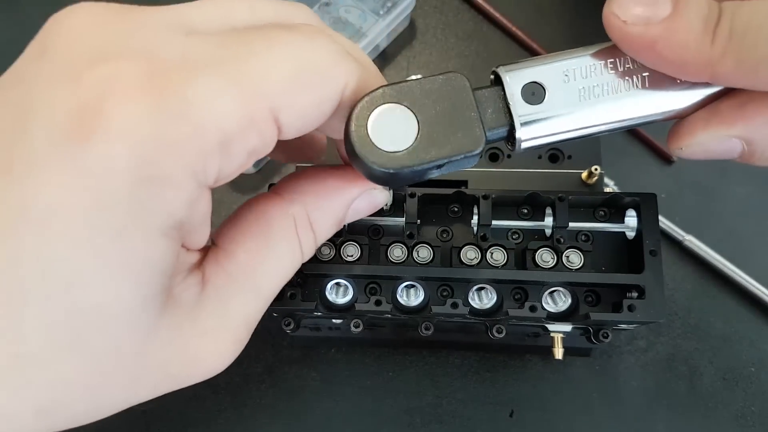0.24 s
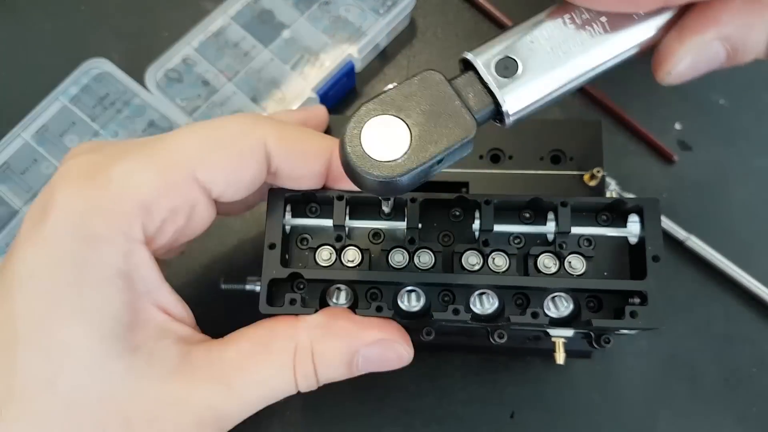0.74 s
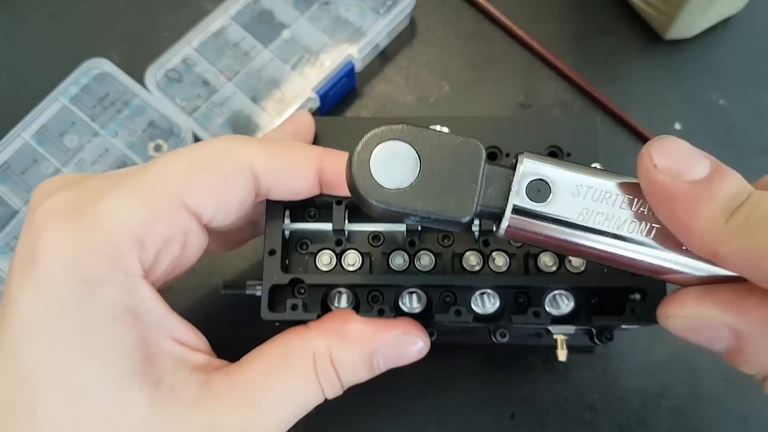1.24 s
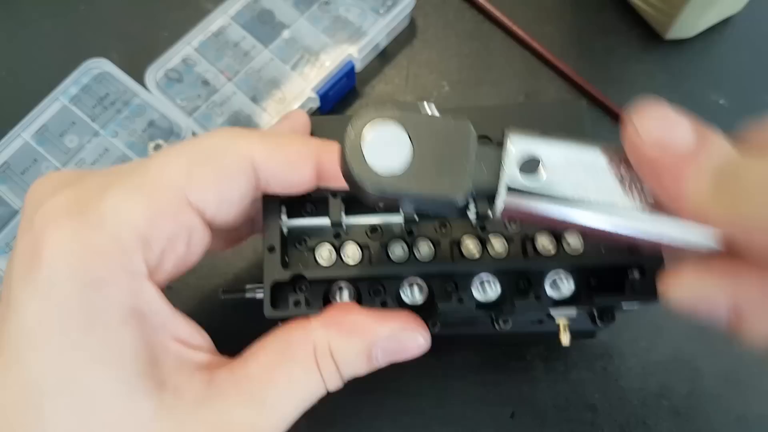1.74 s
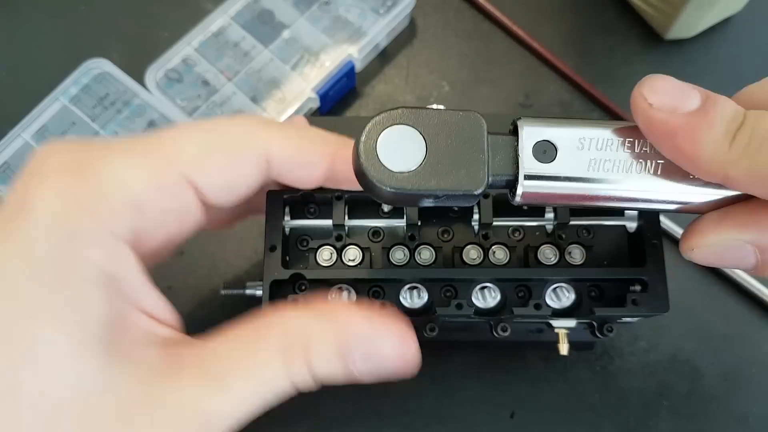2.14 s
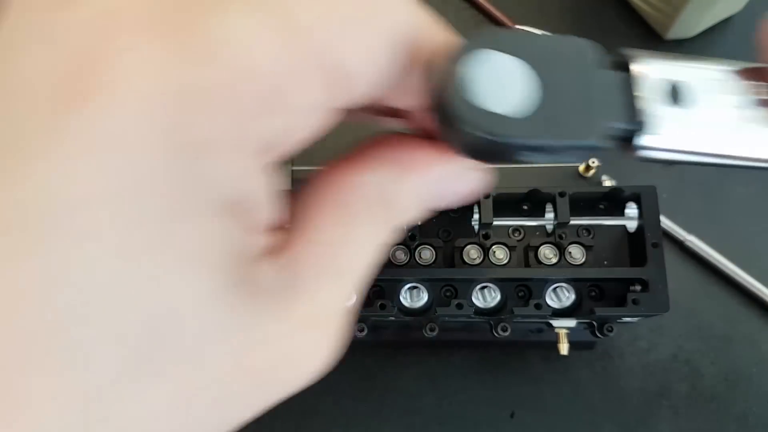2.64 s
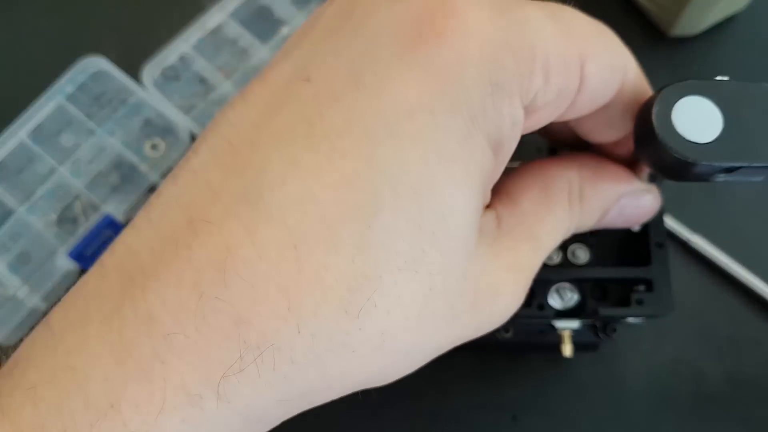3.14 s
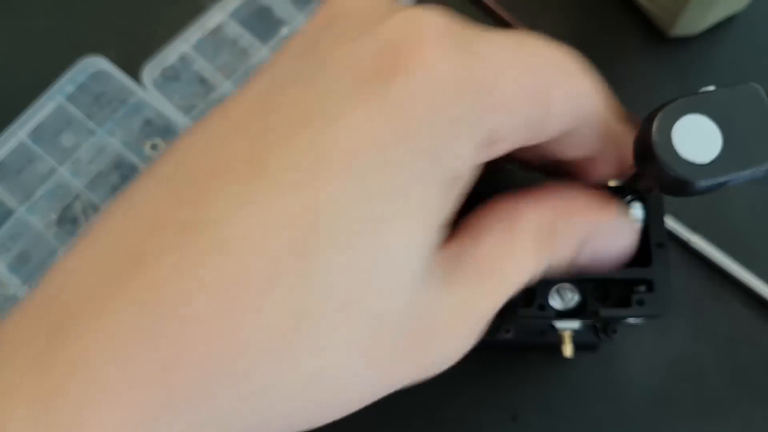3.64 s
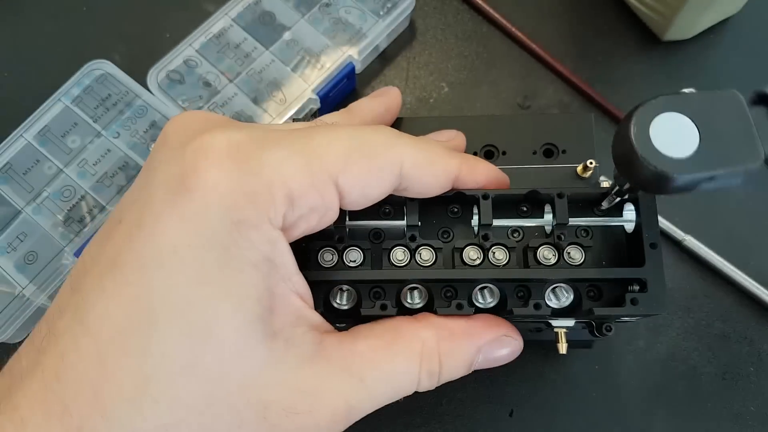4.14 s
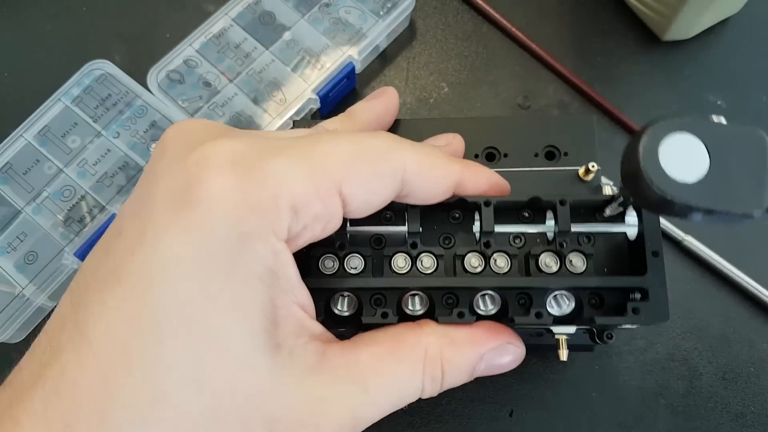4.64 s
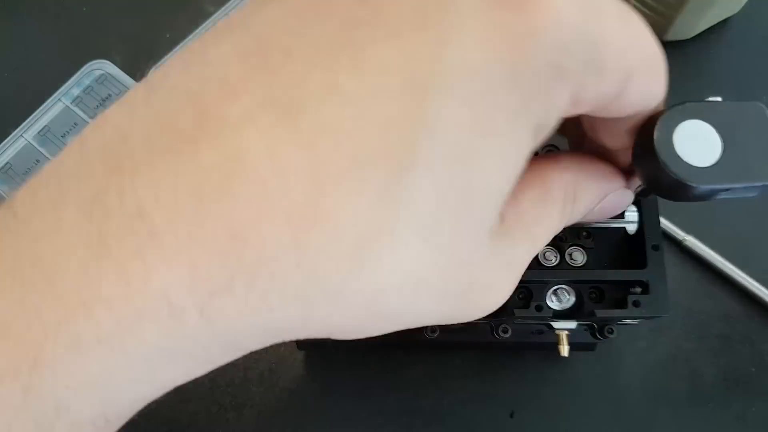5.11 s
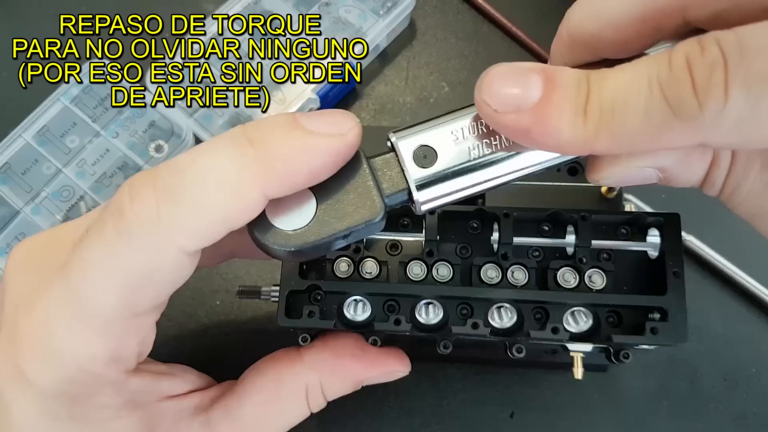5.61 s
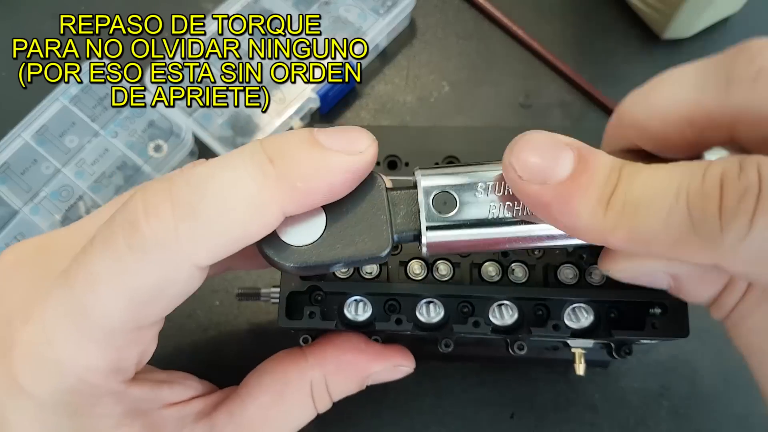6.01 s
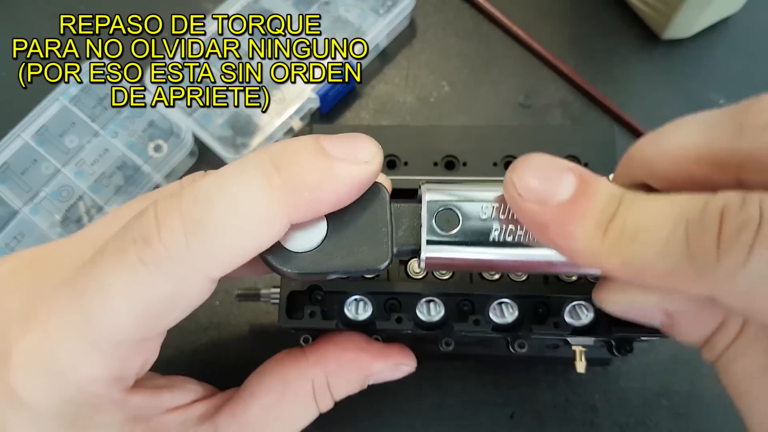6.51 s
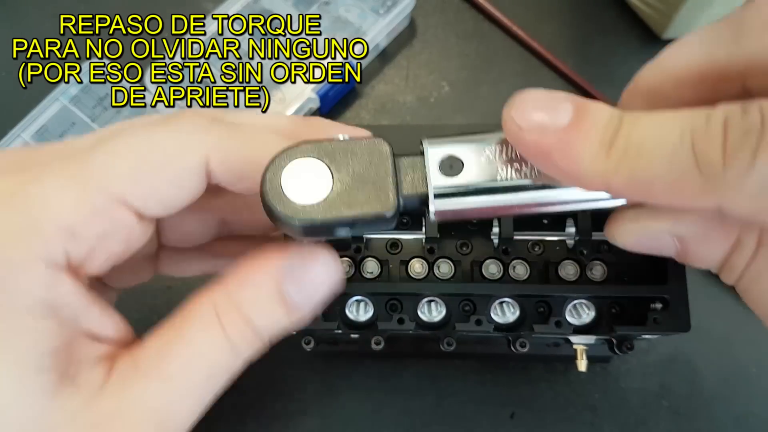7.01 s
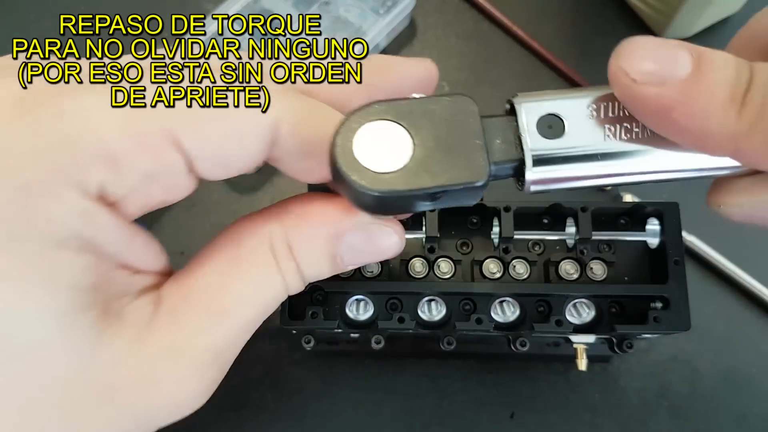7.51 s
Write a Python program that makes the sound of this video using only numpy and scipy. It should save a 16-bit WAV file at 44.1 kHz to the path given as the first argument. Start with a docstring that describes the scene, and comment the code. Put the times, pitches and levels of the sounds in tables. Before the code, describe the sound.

Stereo phone microphone very near small steel parts. Dry metallic clicks with short bright room tails arrive in three clusters of four, four and six, the later ones stronger. Between them the bit ticks, scrapes and pings lightly on bolts, and hands nudge the desk with soft low thumps. A rumbling fan fills the first two thirds, then cuts suddenly to much quieter hissy air.

```python
"""Torque wrench on a model engine

A small click-type torque wrench works on a model engine on a desk, close to a phone with two ports.
Snaps of its pawl and taps of its bit are short rattles filtered by steel modes, a wall and a small room.
The bit pings as decaying sines; scrapes and other short noises are grainy; the desk thuds as low sines.
A fan roars as shaped noise; after a cut to a later moment the low roar is far weaker and a mid hiss
stands out. A faint airy band swells and sinks throughout."""
import sys
import numpy as np
from scipy import signal
from scipy.fft import rfft, irfft, next_fast_len
from scipy.io import wavfile
from scipy.ndimage import uniform_filter1d

SR = 44100
rng = np.random.default_rng(int(sys.argv[2]) if len(sys.argv) > 2 else 0)


def int16_out(signal):
    """Quantize to a 16-bit WAV file."""
    q = np.round(np.clip(np.atleast_2d(signal).T, -1, 1) * 32767)
    wavfile.write(sys.argv[1], SR, q.astype(np.int16))


N = 342216
T = np.arange(N) / SR
SIDES = np.array([[.5], [-.5]])  # splits a left-right difference between the two ports
CUT_S = 5.543
FLOOR_TOP_HZ = 15900  # upper limit of background, grainy noise and room tail

# stereo likeness of the roar and the airy band: f/Hz, left-right correlation
ROAR_ALIKE = [(60, 0.89), (120, 1), (240, 0.9252), (480, 0.59), (950, 0.31), (1890, 0.22), (3770, 0.066),
              (7520, 0.098), (15000, -0.25)]
# stereo lean of the roar and the airy band: f/Hz, left-right level/dB
ROAR_LEAN = [(60, 1.5), (240, 1.5), (950, 1.5), (3770, -0.5), (15000, 0.5)]


def amp(db):
    """Gain of a level in dB."""
    return 10 ** (np.asarray(db) / 20)


def unit(x):
    """x at rms 1."""
    return x / np.sqrt(np.mean(x ** 2) + 1e-20)


def along(points, hz):
    """Interpolate (Hz, value) points on a log frequency axis."""
    f, v = np.transpose(points)
    return np.interp(np.log(hz + 1), np.log(f + 1), v)


def filtered(x, response):
    """Shape x by a complex response of frequency."""
    n = x.shape[-1]
    m = next_fast_len(2 * n if n < SR else n + 8192)
    return irfft(rfft(x, m) * response(np.fft.rfftfreq(m, 1 / SR)), m)[..., :n]


def add(track, s, sound):
    """Lay a stereo sound on the track at a time in seconds."""
    part = track[:, round(s * SR):][:, :sound.shape[1]]
    part += sound[:, :part.shape[1]]


def humps(peaks, hz):
    """Gain in dB of gentle resonances."""
    return sum(db / (1 + (2 * (hz - c) / w) ** 2) for c, w, db in peaks)


def air(colour_db, alike, lean, patchy_db):
    """Stereo noise of rms 1 with soft time-frequency patches of random gain."""
    z = signal.stft(rng.standard_normal((2, N)), nperseg=512)[2]
    field = uniform_filter1d(rng.standard_normal(z.shape[1:]), 6, 0)
    field = uniform_filter1d(field, 14, 1)
    pair = signal.istft(z * amp(patchy_db * unit(field)), nperseg=512)[1][:, :N]

    # the mix of mid and side sets how alike the ports are
    def turn(hz):
        return np.arccos(np.clip(along(alike, hz), -1, 1)) / 2

    def gain(hz):
        return amp(colour_db(hz) + SIDES * along(lean, hz)) * (hz < FLOOR_TOP_HZ)

    mid, side = filtered(pair, lambda hz: [np.cos(turn(hz)), np.sin(turn(hz))])
    return unit(filtered(np.array([mid + side, mid - side]), gain))


def fan():
    """Fan noise in the room's low resonances, and the thinner background after the cut."""
    # broad colour of the roar: f/Hz, relative level/dB
    roar_colour = [(12, -54), (20, -12), (60, -18), (135, -2), (237, -8.5), (372, -7.5), (465, -12),
                   (816, -13), (966, -15), (1650, -20.5), (3140, -31.5), (4530, -38.5), (8650, -51),
                   (15200, -47.5), (16500, -78)]
    # resonances in the roar: f/Hz, width/Hz, boost/dB
    roar_peaks = [(130, 38.5, 5.5), (205.6, 8.6, 8), (374.3, 43, 4.5), (807, 100, 6), (550, 62, 3.5),
                  (1624, 13, 5.5), (2820, 150, 4)]
    # broad colour of the hiss: f/Hz, relative level/dB
    hiss_colour = [(12, -41), (20, 3), (48, -12), (65, -14), (131, -0.5), (237, -6), (361, -7.5), (452, -9),
                   (839, -10.5), (994, -16), (1430, -17.5), (2660, -2.5), (8650, -24.5), (15200, -23),
                   (16500, -22)]
    # resonances in the hiss: f/Hz, width/Hz, boost/dB
    hiss_peaks = [(132, 28.63, 5), (199.5, 16, 6), (371, 42, 8), (820, 150, 3.5), (1849.8, 190, 6),
                  (2440, 290, 1.5), (3320, 354, -2), (4593, 456, -2.5)]
    # stereo likeness of the hiss: f/Hz, left-right correlation
    hiss_alike = [(60, 0.9496), (180, 0.9968), (550, 0.6), (1650, 0.14), (4970, 0.072), (15000, 0.0)]
    # stereo lean of the hiss: f/Hz, left-right level/dB
    hiss_lean = [(60, 1), (240, 2.5), (950, 1), (3770, -0.5), (15000, 0.5)]
    roar_db, hiss_db = -33.5, -46
    roar = air(lambda hz: along(roar_colour, hz) + humps(roar_peaks, hz),
               ROAR_ALIKE, ROAR_LEAN, patchy_db=0.37)
    hiss = air(lambda hz: along(hiss_colour, hz) + humps(hiss_peaks, hz),
               hiss_alike, hiss_lean, patchy_db=1.421)
    return np.where(T < CUT_S, amp(roar_db) * roar, amp(hiss_db) * hiss)


def airy_band():
    """A faint band of air noise around 4550 Hz swells and sinks."""
    # swells of the band: t/s, level/dB
    swells = [(0, -74), (.45, -65), (.9, -56.5), (.97, -68), (1.35, -75), (1.43, -58), (1.75, -64),
              (2.1, -63), (2.4, -70), (4.0, -69), (4.8, -60), (4.9, -53), (5.05, -68), (5.5, -74),
              (5.56, -52), (5.75, -62), (7.0, -62), (7.76, -58)]
    band = air(lambda hz: -20 * np.log10(1 + ((hz - 4550) / 480) ** 2),
               ROAR_ALIKE, ROAR_LEAN, patchy_db=1.5)
    return amp(np.interp(T, *np.transpose(swells))) * band


def rattle(ms, shared_hz):
    """A few ms of contacts with an even spectrum; the ports hear them alike only in the bass."""
    first_db = 5  # the first contact stands out
    t = np.arange(1024) / SR
    fade = np.exp(-(t / (abs(ms) / 1000)) ** 2)
    z = rfft(rng.standard_normal((3, len(t))) * fade * amp(first_db * np.exp(-t / 0.00034)))
    share = 1 / (1 + (np.fft.rfftfreq(len(t), 1 / SR) / shared_hz) ** 6)
    z = np.sqrt(share) * z[0] + np.sqrt(1 - share) * z[1:]
    even = irfft(z / np.sqrt(uniform_filter1d(abs(z) ** 2, size=10)))
    return even * (t < .01)


def steel(hz, spread_db):
    """The modes of wrench and engine block, each struck at a new strength."""
    # resonant modes: f/Hz, width/Hz, level/dB
    modes = [(1210, 230, -7), (1580, 250, 0), (2100, 350, 0.5), (2473, 320, 1), (3310, 385, 3),
             (4100, 380, 3), (4750, 520, 4), (5730, 870, 3), (6970, 540, 5), (7960, 580, 0),
             (10430, 2200, -2), (11270, 1740, -1), (12900, 640, -2), (14100, 698.8, -2), (15100, 580, 5.5)]
    draw = rng.normal(0, spread_db, len(modes))
    return sum((-1) ** k * amp(db + draw[k]) * 1j * hz * w / (c * c - hz * hz + 1j * hz * w)
               for k, (c, w, db) in enumerate(modes))


def room(spectrum):
    """A fresh diffuse tail of the given colour; each frequency dies at its own speed."""
    # decay of the room: f/Hz, t60/s
    decay = [(1000, 0.3), (3000, 0.6), (7000, 0.62), (15000, 0.27)]
    # colour of the room: f/Hz, level/dB
    colour = [(1500, -1), (2600, 0.5), (4500, -1.5), (7000, -2.5), (9500, -3), (13000, 0), (15500, -7)]
    hz, t, z = signal.stft(rng.standard_normal((2, SR // 2)), SR, nperseg=256)
    fade_db = along(colour, hz) + along(spectrum, hz) - 60 * t[:, None] / along(decay, hz)
    return signal.istft(z * amp(fade_db.T) * (hz < FLOOR_TOP_HZ)[:, None], SR, nperseg=256)[1]


def clicks(rows, colours):
    """Each click is a short rattle that rings the steel, then a wall and the room; colours take turns."""
    # bands knock, tock, tick, body, clack, ring, fizz, sparkle: middle f/Hz, width/Hz
    bands = [(1500, 600), (2100, 1050), (2600, 1050), (3300, 950), (4900, 2400), (7200, 2100),
             (10400, 4700), (14700, 3500)]
    # share of a click's weight in each band [ratio]
    weight_reach = [1.38, 1.2, 1.07, 1.26, 0.06, 0.36, 0.57, 0.084]
    # share of a click's brightness in each band [ratio]
    bright_reach = [0.43, 0.18, 0, 0.037, 0, 0.54, 0.72, 1]
    # colour change of every click after the cut: f/Hz, level/dB
    after_cut = [(1500, -23.5), (2100, -12), (2600, 8), (3300, 2.5), (4900, 0), (7200, 1.5), (15000, -3.5)]
    # port balance for near sounds: f/Hz, left-right level/dB
    ports = [(1500, -1), (2000, 2.5), (2600, -9), (3300, 2), (5500, -1), (6800, -5), (9000, 5.5),
             (15000, 1.5)]
    # phase between the ports: f/Hz, left lead/rad
    port_lead = [(1400, 0), (2000, -2.1), (2600, -3.5)]
    direct_db, answer_db = 68, 24.5  # gain of the rattle, of the room's answer
    edge_db, deep_db = -9.5, -30  # fall beyond the outer bands, in the deep bass
    wall_s, wall_db = .0105, -17.5  # a near wall returns each click once, as a fresh rattle
    lead = 64  # samples of silence ahead of a rattle, room for the phase shift
    out, (hz_mid, width) = np.zeros((2, N)), np.transpose(bands)
    for k, (s, db, weight_db, bright_db, pan_db, ms, *more) in enumerate(rows):
        tint_db = weight_db * np.array(weight_reach) + bright_db * np.array(bright_reach)
        tint_db = tint_db + (s > CUT_S) * along(after_cut, hz_mid)
        tint_db[[0, 3]] += more[:2] or 0  # extra knock and body, where given
        level_db = db + tint_db + colours[k % len(colours)] - 10 * np.log10(width)
        spectrum = [(450, level_db[0] + deep_db), (900, level_db[0] + edge_db),
                    *zip(hz_mid, level_db), (17000, level_db[-1] + edge_db)]

        def gain(hz):
            balance_db = SIDES * (pan_db + along(ports, hz))
            level = amp(along(spectrum, hz) + direct_db + balance_db)
            return steel(hz, spread_db=0.5) * level * np.exp(1j * SIDES * along(port_lead, hz))

        for late_s, late_db in (0, 0), (wall_s, wall_db):
            contacts = np.pad(rattle(ms, shared_hz=2240.0), ((0, 0), (lead, 0)))
            add(out, s + late_s - lead / SR, amp(late_db) * filtered(contacts, gain))
        answer = filtered(room(spectrum), lambda hz: steel(hz, spread_db=0.5))
        add(out, s + .004, amp(answer_db) * answer)
    return out


def faint_taps(count):
    """Rows for barely heard touches of the bit at chance moments."""
    faint_db, spread_db, faint_ms = -53.5, 3, 2.5
    when, size = rng.random(count), rng.standard_normal((count, 4))
    return [(.05 + u * (N / SR - .1), faint_db + spread_db * a, *spread_db * np.array(rest), faint_ms)
            for u, (a, *rest) in zip(when, size)]


def bit_taps():
    """The bit taps bolt heads, and once drops freely on one: rattles in the steel."""
    # taps: t/s, relative level/dB, weight/dB, brightness/dB, left-right level/dB, rattle/ms
    taps = [(.2011, -42, 5, -9, 1, 2.3), (.2984, -44.5, -5, -10, 1.5, 2.1), (1.0433, -52, 6, 1, 0, 2.9),
            (1.5434, -50, -4, -7, 5, 2.5), (2.4962, -49, -4, 2, .5, 2.5), (2.5147, -31.5, -4.5, -3, 0, 2.5),
            (2.5225, -45, -2, 2, 1, 2.5), (2.5500, -48, 6, 9, -1, 2.9), (3.0817, -38.5, -4, -5, 0, 2.8),
            (3.241, -40, -6, -5, 1, 3.5), (3.4151, -50, -4, 7, -1.5, 2.5), (4.8613, -41, -6, -2, 2, 3.04),
            (4.8788, -43, 0, -2, 1, 2.4), (4.9215, -41, -7, -1, -2, 2.8), (5.3192, -33, -2, -1, -1, 2),
            (6.2997, -39.5, -5, -6, -2.5, 2.4), (7.2219, -43, 1, 10, .5, 4.3), (7.2277, -42, 5.5, 0, 5, 2),
            (7.229, -36, -5, 4, -.5, 3.1), (7.26, -39, -9, 10, 1, 2.7), (7.268, -43, -5, 7, 1, 2.5),
            (7.2785, -46, -5, 9, 1, 6), (7.7283, -31.5, -7.5, -2, 7, 5.9)]
    # colour of a tap in each band: level/dB
    tap_colour = [-1, 4.5, -4.5, -4, -13, -12.5, -9, -12]
    # free drop: t/s, relative level/dB, weight/dB, brightness/dB, left-right level/dB, rattle/ms
    drop = [(3.968, -12, 0, 0, -1.5, 3.6)]
    # colour of the drop in each band: level/dB
    drop_colour = [-37, -11.5, -19, -21, -11.5, -16, -8, -6]
    return clicks(taps + faint_taps(count=6), [tap_colour]) + clicks(drop, [drop_colour])


def bit_pings():
    """The loose bit rings on after a contact as decaying sines."""
    # pings: t/s, f/Hz, level/dB, t60/s
    pings = [(.202, 3300, -38, .03), (.202, 6700, -58, .05), (2.516, 6600, -44, .02),
             (2.519, 3400, -42, .04), (3.082, 6700, -51, 0.11), (3.2415, 6400, -44, .025),
             (3.416, 6800, -56, .05), (3.968, 3800, -34.5, 0.11), (3.969, 6500, -39, 0.0186),
             (7.2287, 2990, -21, .012), (7.261, 7000, -50, 0.17)]
    out, t = np.zeros((2, N)), np.arange(SR // 4) / SR
    for s, hz, db, t60 in pings:
        onset = 1 - np.exp(-t / 0.00043)
        add(out, s, amp(SIDES * -2.5 + db - 60 * t / t60) * np.sin(2 * np.pi * hz * t) * onset)
    return out


def desk():
    """The pull of the hands rings the desk top in soft low blows, the same in both ports but for level."""
    # thuds: t/s, relative level/dB, extra level below 90 Hz/dB
    thuds = [(0.921, -18.5, -15.5), (1.066, -12.5, -18), (1.161, -21, -10), (1.225, -21, 4),
             (1.466, -18, 5), (1.667, -19.5, -12.5), (1.823, -17, -6), (4.09, -14, -5), (4.275, -16, -2),
             (4.445, -25.5, 11.5), (4.55, -24, -12), (4.654, -28, 13), (4.864, -18.5, -1),
             (4.926, -19, -10.5), (6.29, -33, -3), (7.73, -48, 13)]
    # modes of the desk top: f/Hz, level/dB, t60/s
    desk_modes = [(51, -19, 0.3695), (75.5, -3, 0.12), (113.3, 1, 0.16), (140, 1, 0.063), (203.5, -6, 0.25)]
    out, t = np.zeros((2, N)), np.arange(SR // 2) / SR
    onset = 1 - np.exp(-t / 0.0061)
    for s, db, deep_db in thuds:
        thud = sum(amp(db + level + deep_db * (hz < 90) - 60 * t / t60) * np.sin(2 * np.pi * hz * t)
                   for hz, level, t60 in desk_modes)
        add(out, s, 0.5 * thud * onset * amp(SIDES * 2.823))
    return out


def grainy_noises(table, spiky, fade_db):
    """Short grainy noises through the steel modes, the two ports partly unalike."""
    out = np.zeros((2, N))
    for s, length, db, centre_hz in table:
        t = np.arange(round(length * SR) + 512) / SR
        grains = rng.standard_normal((3, len(t)))
        grains = grains * rng.exponential(1, len(t)) ** spiky * (t < length)
        grit = (grains[0] + 0.35 * grains[1:]) * amp(fade_db * t / length)

        def response(hz):
            band = (hz < FLOOR_TOP_HZ) / (1 + (3 * np.log((hz + 1) / centre_hz)) ** 2) ** 1.5
            return steel(hz, spread_db=1.5) * band

        add(out, s, amp(db) * unit(filtered(grit, response)))
    return out


def pawl():
    """The pawl snaps over and back in turn; a short faint noise leads into each snap."""
    # snaps: t/s, relative level/dB, weight/dB, brightness/dB, left-right level/dB, rattle/ms,
    # extra knock/dB, extra body/dB, level of the lead-in noise/dB
    snaps = [(1.217, -30.5, 7.5, -9, 2, 2.2, -5, -8.5, -41),
             (1.4668, -20.5, 3, -0.5, 2.5, 1.6, -5.5, -1, -38), (1.8204, -29, 5.5, 2, 1, 3.1, -9, -6, -38),
             (2.004, -30.5, 3, 0, 0, 2.4, 2.5, 4, -66), (4.274, -19, -3.5, 6.5, -2, 2.9, 0.5, 5, -34),
             (4.4466, -17, -2, 3, -4, 2, -2, 1, -55), (4.652, -22, 2, 2.5, -1.5, 3.9, -5.5, -4.5, -30.5),
             (4.8405, -21.5, 1.5, 2.5, -2.5, 2.3, -5, -0.5, -45),
             (6.0849, -22, 0, 0, -0.5, 2.7, 2, -1, -46), (6.2798, -23.5, 4.5, 0, 1, 3.4, 3, 1.2, -51),
             (6.4624, -14, -4, 8, -2, 3.4, -4.5, 1.5, -45), (6.62, -19.5, 2.5, -1, 0, 2.5, -1, 0, -53),
             (6.7236, -16, -3.5, 7.5, -0.5, 3.2, 3.5, -0.5, -66),
             (6.8358, -18, 0.5, -7.5, 0, 2.7, -3, -5, -55)]
    # colour of a snap over in each band: level/dB
    over = [0, -1, -4, -5.5, -10.5, -5, -14, -11.5]
    # colour of a snap back in each band: level/dB
    back = [-9, 2.5, -9.5, -10.5, -11, -14, -15.5, -14]
    lead_in_s, lead_in_hz = 0.0037, 2100  # length of the lead-in noise, middle of its band
    lead_ins = [(s - lead_in_s, lead_in_s, db, lead_in_hz) for s, *_, db in snaps]
    return clicks(snaps, [over, back]) + grainy_noises(lead_ins, spiky=0.6, fade_db=0)


def scrapes_and_swish():
    """Short fading noises through the steel: bit scrapes, a noise leading into the snap at 4.652 s,
    and a dying swish of room sound just after the cut."""
    # fading noises: t/s, length/s, level/dB, middle f/Hz
    fading_noises = [(2.518, 0.012, -44, 2650), (2.518, 0.0191, -59, 12000), (2.532, 0.012, -50, 2700),
                     (2.542, .013, -49, 2680), (2.538, .016, -54, 11510), (4.6455, .005, -39, 2090),
                     (5.545, 0.028, -59, 5450), (5.545, 0.12, -56.5, 5040), (7.264, 0.032, -54, 4500),
                     (7.732, 0.012, -48, 2601)]
    return grainy_noises(fading_noises, spiky=0.52, fade_db=-8)


def scene():
    """All sources at the two ports."""
    background = fan() + airy_band()
    return background + bit_taps() + bit_pings() + desk() + pawl() + scrapes_and_swish()


def record(dry):
    """The phone clips at full scale, cuts the deepest bass and keeps nothing above its band limit."""
    top_hz = 17050

    def response(hz):
        return np.clip((top_hz - hz) / 300, 0, 1) / (1 + (33 / (hz + 1)) ** 6)

    return filtered(np.clip(dry, -1, 1), response)


dry = scene()
out = record(dry)
int16_out(out)
```